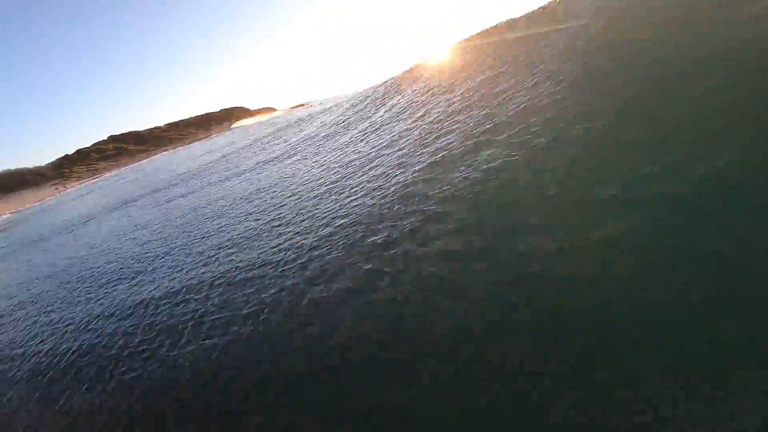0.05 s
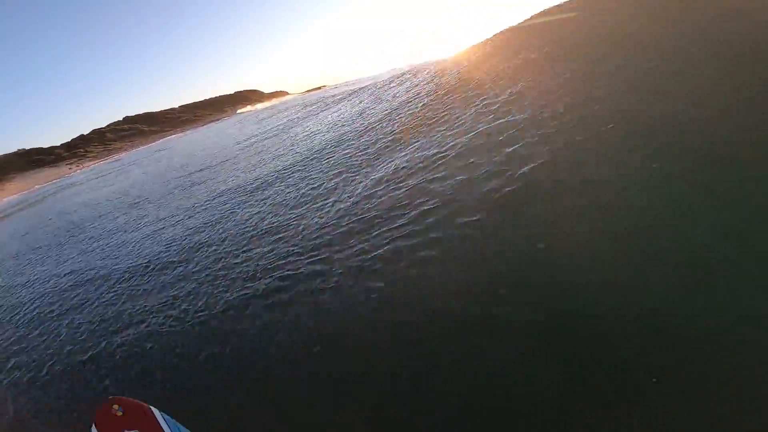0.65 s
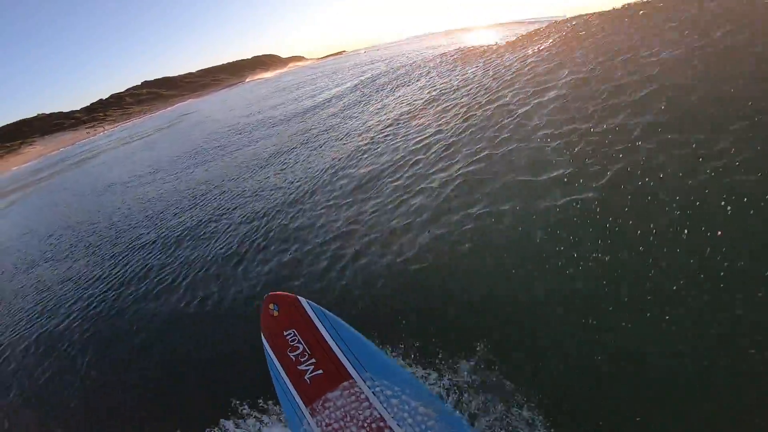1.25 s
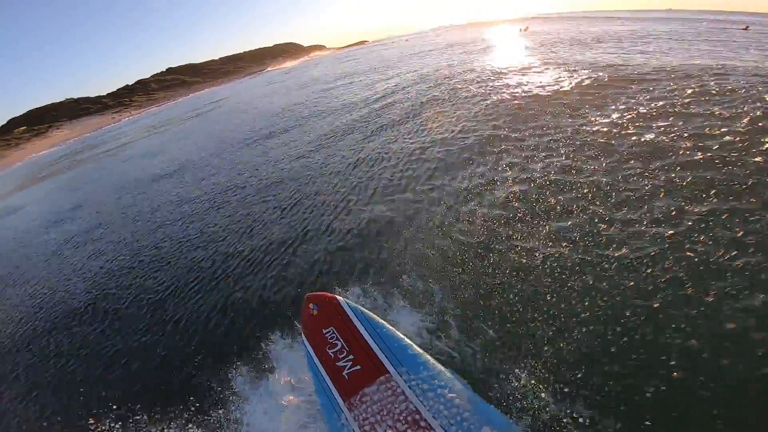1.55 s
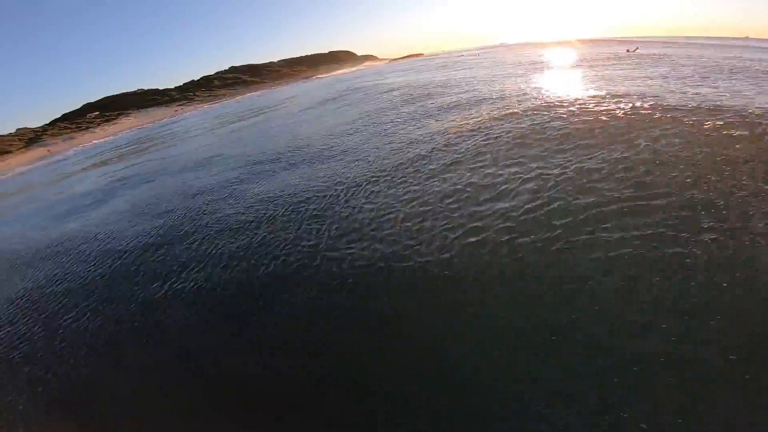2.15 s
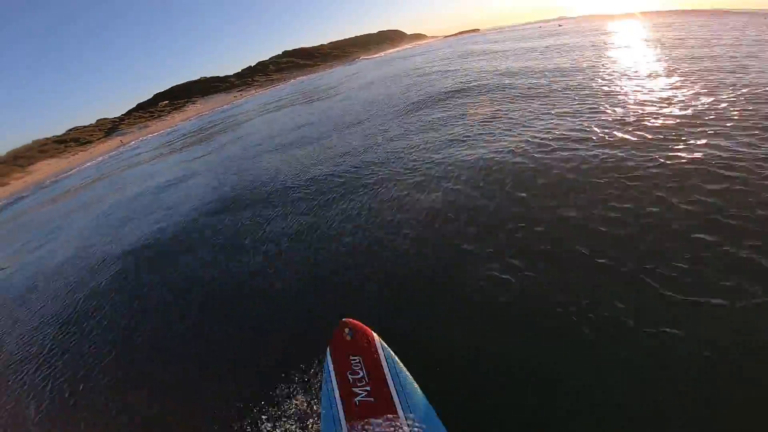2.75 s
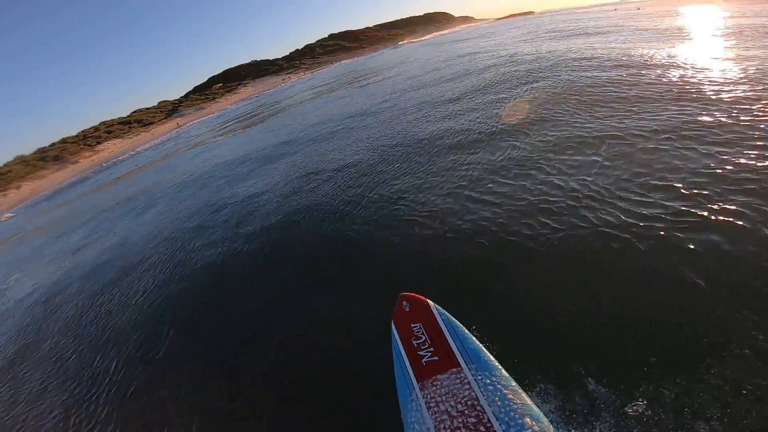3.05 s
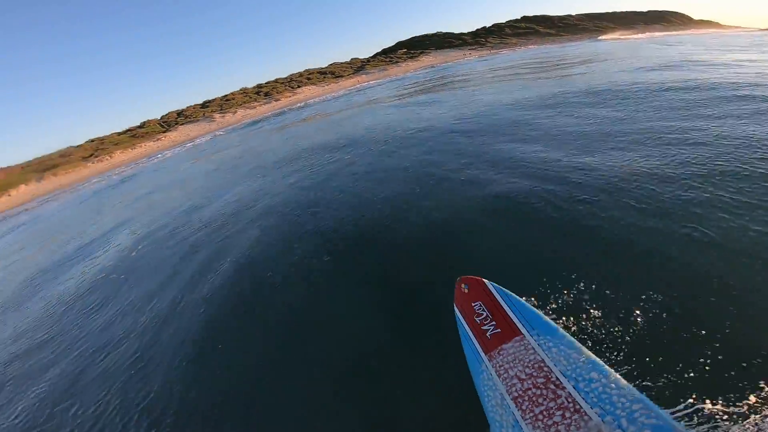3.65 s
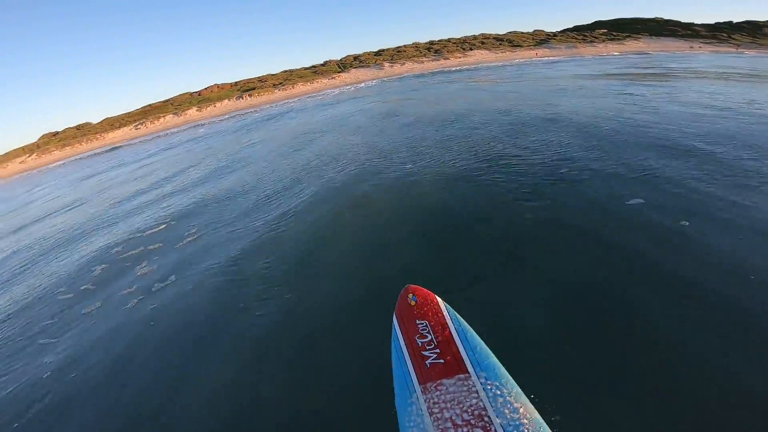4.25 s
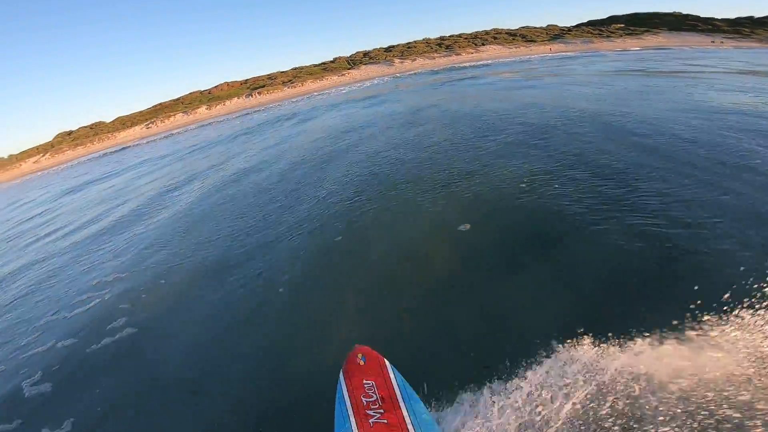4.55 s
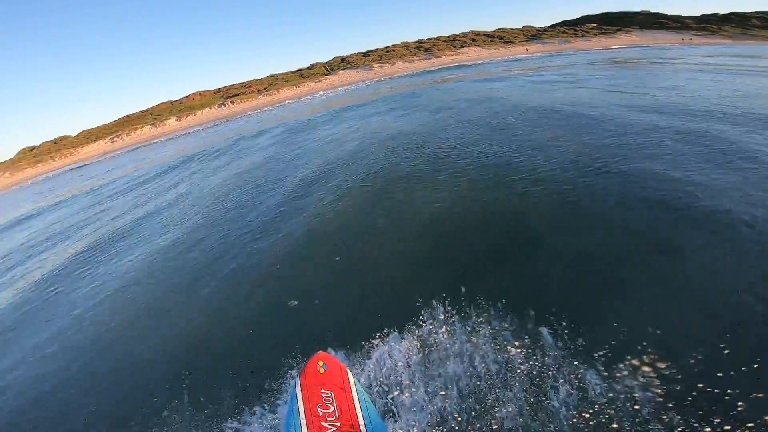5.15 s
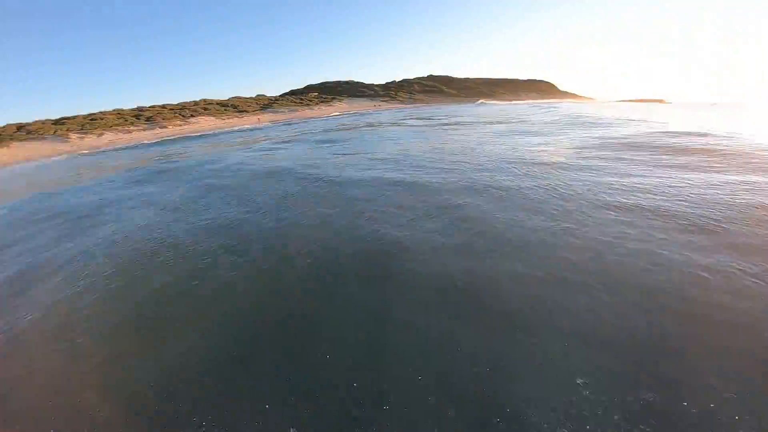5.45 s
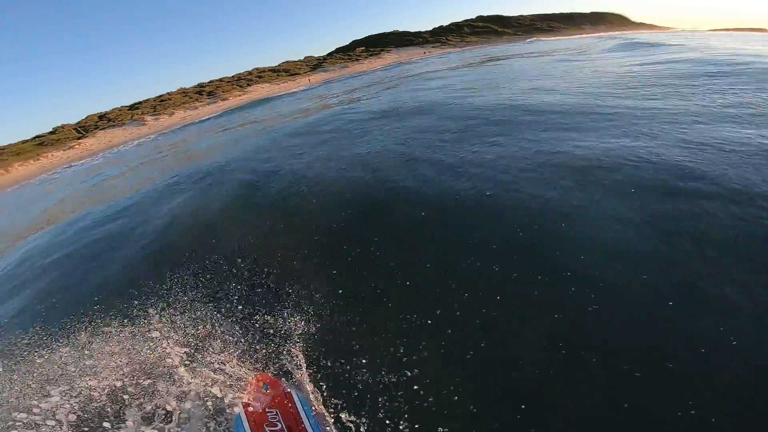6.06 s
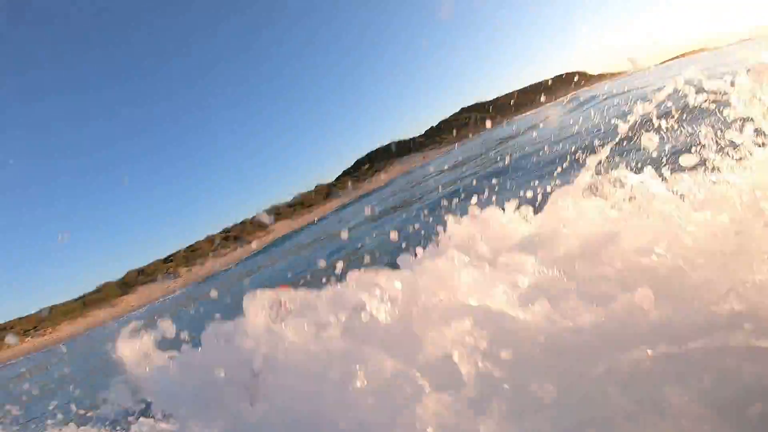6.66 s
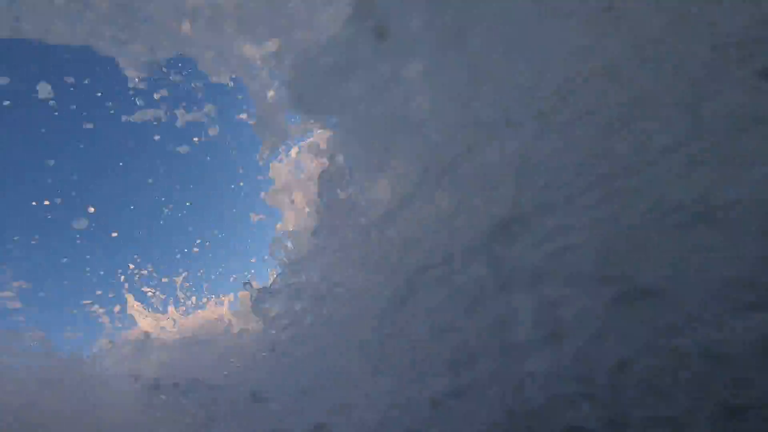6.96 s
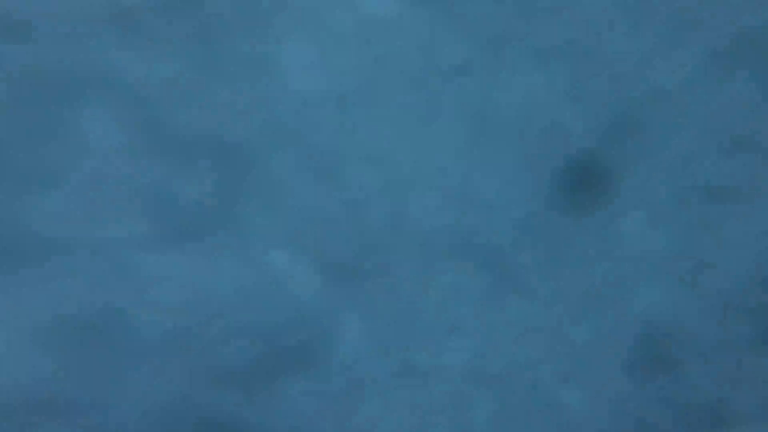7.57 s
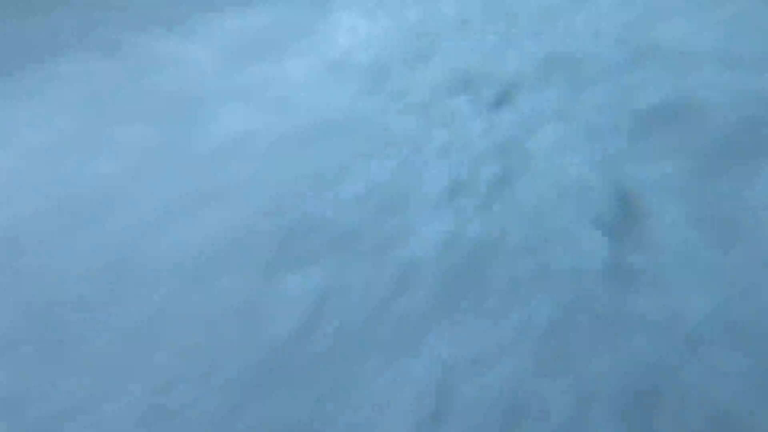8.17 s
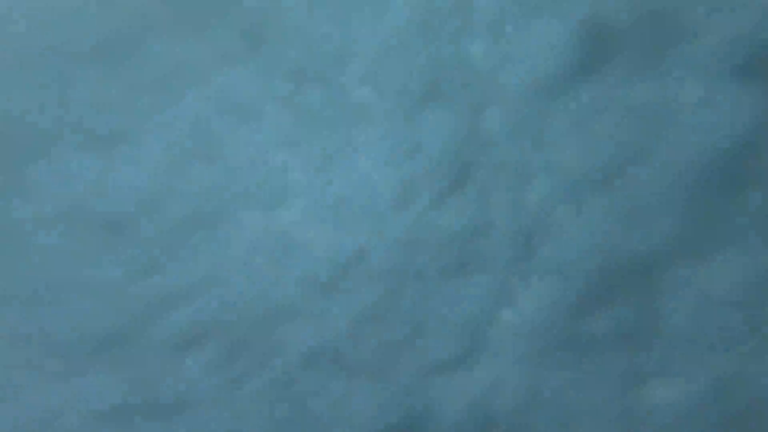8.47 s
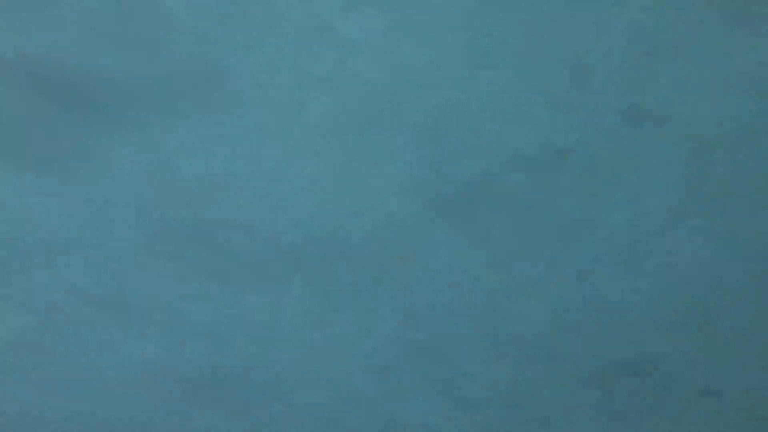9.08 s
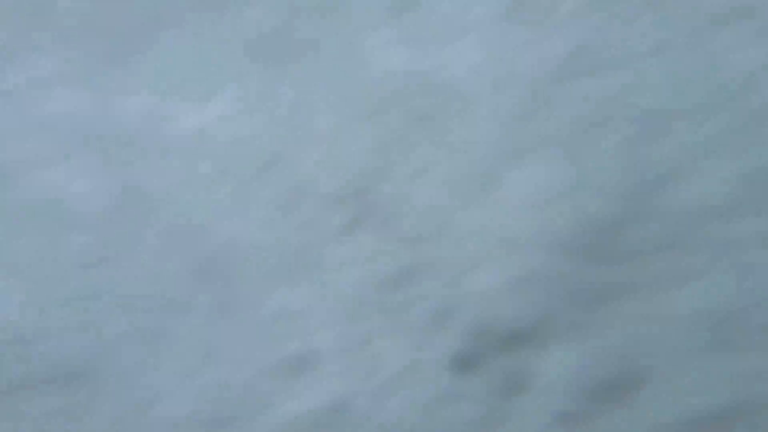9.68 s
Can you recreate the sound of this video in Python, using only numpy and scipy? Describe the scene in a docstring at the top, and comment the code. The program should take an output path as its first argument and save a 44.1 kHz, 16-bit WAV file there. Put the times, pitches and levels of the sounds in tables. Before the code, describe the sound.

Heard close up from a surfboard on a wave, rushing water, fizzing spray and gusts of wind swell and ease, dotted with small splashes. A hollow roar of whitewater builds from behind and breaks over the microphone with spatters and a sharp slap. The hiss then gives way to a dull underwater rumble, with surging clouds of bubbles, single bloops, light crackling and faint thin tones.

```python
"""Whitewater roars, hisses and sprays from a surfboard, heard at a small camera that rides with it.
The water sounds through trapped air: each bubble is a resonator, lower in pitch the larger it is.
Turbulent wind buffets the microphone. At about 7 s the wave breaks over the camera, and all is
muffled: a churning rumble, clouds of bubbles, fine crackle and a few thin, flickering tones."""
import sys
import numpy as np
from scipy import signal
from scipy.fft import rfft, irfft, next_fast_len
from scipy.io import wavfile

SR = 44100
rng = np.random.default_rng(int(sys.argv[2]) if len(sys.argv) > 2 else 0)


def persist_wave(psi):
    """Save psi, clipped to +-1, as 16-bit WAV."""
    counts = np.round(np.clip(psi, -1, 1) * 32767).astype(np.int16)
    wavfile.write(sys.argv[1], SR, np.atleast_2d(counts).T)


N = 433062
T = np.arange(N) / SR
PLUNGE_S = 7.36  # the microphone goes under
FILM = np.clip(1 + (T - PLUNGE_S) / 0.21, 0, 1)  # a film of water closes over it, from 0 to 1
FILM_PITCH = 0.76 ** FILM  # wash and foam sink beneath the film


# How hard the board cuts the water: t/s, relative level/dB
BOARD_CUT = [(0.0, -31.5), (0.71, -35.5), (0.82, -30), (1.45, -30.5), (1.81, -38), (2.08, -35),
             (2.3, -41.5), (3.88, -41), (3.9, -35.5), (4.37, -34.5), (4.61, -39.5), (6.41, -31),
             (6.74, -35.5), (6.92, -28.5), (7.23, -32.5), (7.25, -37), (7.33, -30)]
def cut_gain(glide_db, follow):
    """Power law: the level is glide_db at an easy glide and gains follow dB per dB of harder cut."""
    return amp(glide_db + follow * (curves(BOARD_CUT)[0] + 36))


# Sheets thrown by a turn or the falling lip: peak t/s, rise/s, roar level/dB, foam level/dB, pitch factor
WATER_SHEETS = [(0.15, 0.63, -53, -41, 1.9), (0.48, 0.034, -24.5, -54, 2.3), (0.81, 0.13, -19, -43.5, 1.09),
                (1.08, 0.51, -22, -46, 1.26), (1.86, 0.24, -22, -59, 0.69), (2.65, 0.046, -20.5, -44, 0.43),
                (3.98, 0.21, -23.5, -40, 0.37), (4.215, 0.086, -22.5, -34, 1.42),
                (4.405, 0.045, -20, -41, 1.38), (4.9, 0.36, -37.5, -45.5, 2.2),
                (5.48, 0.31, -24, -58, 1.35), (6.27, 0.75, -27, -40, 1.7), (6.98, .015, -32.5, -25, 1.3),
                (7.07, 0.06, -29, -30, 0.54), (7.19, 0.047, -16, -28.5, 1.1)]
SHEET_FALL = 1.43  # fall time over rise time
# Roar of wake and sheets: f/Hz, relative level/dB
ROAR_SPECTRUM = [(90, -16), (180, 1.5), (280, -2.5), (420, -4.5), (620, -7.5), (1000, -13), (1600, -21),
                 (3000, -52), (15000, -94)]
def whitewater():
    """Incoherent sources add in power: wake and sheets roar together, and the stronger sets the pitch."""
    wake, sheets, approach = np.square(whitewater_gains())
    power = wake + sheets
    pitch = (0.87 * wake + curves(WATER_SHEETS)[-1] * sheets) / power
    chop_db = 2.3 - 2.4 * approach / (power + approach)  # the choppy face gives way to even whitewater
    return sliding(white(), ROAR_SPECTRUM, pitch) * eddies(rate_hz=45, depth_db=chop_db) * np.sqrt(power)


def whitewater_gains():
    """Pressure amplitudes of the wake, the thrown sheets and the breaker catching up from behind."""
    wake = cut_gain(glide_db=-33.5, follow=0.3)
    sheets = swells(WATER_SHEETS, SHEET_FALL, count=1)[0]
    approach = amp(-16.5 - 13 * np.maximum(6.585 - T, 0))  # gains 13 dB/s, then holds
    return wake, sheets, approach


# Hollow roar of the curl: f/Hz, relative level/dB
BREAKER_SPECTRUM = [(70, -1.5), (160, -5), (380, -1), (600, -2), (900, -4.5), (2300, -16), (4000, -41.5),
                    (15000, -89)]
def breaker():
    """Collective oscillation: the curl's cloud of air roars, swelling as it nears, sinking as it folds."""
    fold_s, octaves_per_s = 6.18, 1.05
    pitch = 1.06 * 2 ** (-octaves_per_s * np.clip(T - fold_s, 0, PLUNGE_S - fold_s))
    roar = sliding(white(), BREAKER_SPECTRUM, pitch)
    return roar * eddies(rate_hz=40, depth_db=1.1) * whitewater_gains()[2]


# Wash of the board: f/Hz, relative level/dB
WASH_SPECTRUM = [(200, -6.5), (500, 2), (900, 0.5), (1600, 2), (2300, 0.5), (3100, -1.5), (3600, -7),
                 (5000, -28), (5900, -33), (10000, -59)]
# Fizz of its foam: f/Hz, relative level/dB
FOAM_SPECTRUM = [(1500, -37), (3000, -17), (3700, -0.5), (4500, 4), (5050, 3.5), (5600, -6), (6500, -34.5),
                 (15000, -77.5)]
def board():
    """Drop impact and bubble resonance: the board tears the water into wash, foam and spray."""
    sheet_foam = swells(WATER_SHEETS, SHEET_FALL, count=2)[1]
    foam_gain = np.hypot(cut_gain(glide_db=-42.5, follow=0.7), sheet_foam)
    # loud foam and the breaking lip land on the camera, where single bubbles and spatters stand out
    near = np.maximum(np.clip((20 * np.log10(foam_gain) + 38) / 7, 0, 1), FILM)
    drops = droplets(per_s=2500, spread_db=2.0)  # each drop ticks in wash, fizz and spray alike
    foam = cloud(low_hz=1545, high_hz=4760, per_s=1400, cycles=27, rise=0.16)
    froth = np.sqrt(1 - near / 2) * unit(white() + 0.32 * drops) + np.sqrt(near / 2) * foam
    spatter = eddies(rate_hz=32, depth_db=0.8 + 1.5 * near)
    wash = sliding(white() + 0.76 * drops, WASH_SPECTRUM, FILM_PITCH) * cut_gain(glide_db=-31, follow=1)
    fizz = sliding(froth, FOAM_SPECTRUM, FILM_PITCH) * eddies(rate_hz=40, depth_db=0.7 + 0.5 * near)
    return (fizz * foam_gain + spatter * (wash + spray(drops))) * amp(-4.5 * FILM)


# Hiss of fine drops: f/Hz, relative level/dB
SPRAY_SPECTRUM = [(3000, -17.5), (5700, -0.5), (8300, 0.5), (10000, -5.5), (12000, -13), (14000, -25.5),
                  (15500, -43.5)]
# Spray flying off the nose: t/s, relative level/dB
SPRAY_PLUME = [(0.0, -56), (0.16, -62), (1.16, -58), (1.43, -52), (2.04, -56), (2.47, -63), (4.14, -53.5),
               (4.55, -54.5), (5.43, -48.5), (5.57, -51.5), (6.35, -46.5), (6.7, -55), (7.1, -44.5),
               (7.33, -51.5)]
def spray(drops):
    """Low-pass filtering: the spray's upper edge falls as water films over the microphone."""
    def mist_db(hz, t):
        edge_hz = 7700 * (1 + np.exp(np.minimum((6.92 - t) / 0.12, 2)))
        return read(SPRAY_SPECTRUM, hz) - 10 * np.log10(1 + (hz / edge_hz) ** 20)
    mist = shaped(white() + 0.72 * drops, mist_db) * amp(curves(SPRAY_PLUME)[0] + 4)
    return mist * eddies(rate_hz=85, depth_db=5.8 * FILM)  # it reaches the microphone in shreds


# Strength of the turbulence under water: t/s, relative level/dB
TURBULENCE = [(7.41, -15), (7.52, -16), (8.3, -14), (8.55, -17), (8.8, -16), (9.18, -25.5), (9.27, -19.5),
              (9.52, -24), (9.67, -18), (9.81, -14)]
# Shaking of the housing: f/Hz, relative level/dB
RUMBLE_SPECTRUM = [(10, -16.5), (50, 3), (125, -1), (180, -3.5), (260, -15), (450, -37), (4000, -100)]
def rumble():
    """Forced vibration: turbulent pressure shakes the submerged housing."""
    shaking = colour(white(), RUMBLE_SPECTRUM) * eddies(rate_hz=23, depth_db=-0.6)
    return shaking * amp(curves(TURBULENCE)[0] - 0.5)


# Clouds of air sweeping past: peak t/s, rise/s, churn level/dB, gurgle level/dB, crackle level/dB
AIR_GUSHES = [(7.58, 0.11, -14, -46, -56), (7.7, 0.1, -16.5, -71, -86), (7.97, 0.12, -21, -55.5, -59.5),
              (8.2, 0.13, -18, -41.5, -53.5), (8.35, 0.059, -18, -29, -44),
              (8.71, 0.059, -20.5, -35.5, -57.5), (8.87, 0.047, -24, -29.5, -62),
              (9.16, 0.15, -33, -40.5, -63.5), (9.37, 0.11, -25.5, -48, -62.5),
              (9.76, 0.22, -23, -42.5, -51.5)]
def bubble_gains():
    """Power summation: steady shedding by turbulence plus gushes, for churn, gurgle and crackle."""
    stir_db = curves(TURBULENCE)[0] + 16
    shed = amp([-22 + 2 * stir_db, -54 + 0.2 * stir_db, -70.5 + 0.4 * stir_db])
    return np.hypot(shed, swells(AIR_GUSHES, fall=0.78, count=3))


# Churn of large bubbles: f/Hz, relative level/dB
CHURN_SPECTRUM = [(90, -12), (170, 5), (250, 4.5), (380, 2.5), (500, -4.5), (700, -18.5), (950, -25.5),
                  (1400, -34), (3000, -84.5)]
# Their changing size: t/s, pitch factor
CHURN_PITCH = [(7.36, 1.22), (7.8, 0.7), (8.15, 1.11), (8.32, 1.62), (8.5, 1.3), (9.35, 1.53), (9.7, 1.15)]
def churn():
    """Resonance varies inversely with radius: the large bubbles' spectrum slides with their size."""
    large = cloud(low_hz=127.9, high_hz=1078, per_s=750, cycles=17.6, rise=0.22) + 0.43 * white()
    return sliding(large, CHURN_SPECTRUM, curves(CHURN_PITCH)[0]) * bubble_gains()[0]


# Gurgle of small bubbles: f/Hz, relative level/dB
GURGLE_SPECTRUM = [(300, -19.5), (600, 9), (900, 4.5), (1400, 13), (1750, 1.5), (2100, -19.5), (3000, -32),
                   (9000, -75)]
# Crackle of tiny ones: f/Hz, relative level/dB
CRACKLE_SPECTRUM = [(900, -23.5), (2000, 2), (2700, 1.5), (3500, 0), (4800, -16), (8000, -25.5),
                    (11000, -46)]
def small_bubbles():
    """Damped resonance: small bubbles ring around the housing and tiny ones pop on it."""
    _, gurgle_gain, crackle_gain = bubble_gains()
    pops = cloud(low_hz=915, high_hz=8070, per_s=700, cycles=7.8, rise=0.096, spread_db=4.5)
    small = cloud(low_hz=552, high_hz=2790, per_s=930, cycles=11, rise=0.082)
    bunches = eddies(rate_hz=15, depth_db=3.0)
    gurgle = colour(small + 0.49 * pops + 0.5 * white(), GURGLE_SPECTRUM) * gurgle_gain
    crackle = colour(pops + 1.4 * white(), CRACKLE_SPECTRUM) * crackle_gain
    return bunches * (gurgle + crackle)


# Large pockets of air folded under by the wave: start t/s, duration/s, f/Hz, fall/octaves, level/dB
AIR_POCKETS = [(6.34, 0.25, 665, .15, -23.5), (6.48, 0.24, 485.6, 0.09, -22), (6.63, 0.23, 583, .25, -24),
               (6.82, .19, 204, 1.0, -14), (7.21, 0.14, 161.4, .5, -17.5), (7.51, .11, 290, .2, -17),
               (7.813, .06, 980, .05, -33), (8.15, .08, 440, .1, -21)]
def pockets():
    """Cavity resonance: each pocket of air swells into a hollow note and sinks in pitch."""
    out = np.zeros(N)
    for s, length, hz, fall, db in AIR_POCKETS:
        age = np.linspace(0, 1, int(length * SR))
        note = noisy_tone(hz * 2 ** (fall * (.5 - age)), width_hz=0.28 * hz, pure=0.46)
        add(out, s, amp(db) * note * np.sin(np.pi * age))
    return out


# Single bubbles at the microphone, and a sharp slap of water at 6.994 s that rings as briefly: t/s, f/Hz, peak
# level/dB
CLOSE_BUBBLES = [(6.994, 2980, -9.5), (7.034, 4400, -8.5), (7.358, 550, -12.5), (8.104, 760, -19.5),
                 (8.136, 1310, -26), (8.168, 487, -18), (8.279, 970, -19.5), (8.302, 602, -14),
                 (8.385, 546, -15.5), (8.777, 510, -19), (9.083, 2600, -44), (9.085, 567, -23.5),
                 (9.133, 560, -12), (9.139, 1340, -29), (9.345, 477, -17.5), (9.423, 1620, -27),
                 (9.456, 3680, -43), (9.555, 3150, -34), (9.644, 397, -14)]
def bloops():
    """Free oscillation: each bubble rings for the same number of cycles, so high ones die sooner."""
    out, cycles = np.zeros(N), 17
    for s, hz, db in CLOSE_BUBBLES:
        ring = bubble(hz, cycles / hz, rise=0.086)
        add(out, s, amp(db) * ring / abs(ring).max())
    return out


# Drops and slaps of water at the microphone: t/s, peak level/dB, centre f/Hz, t60/s
WATER_IMPACTS = [(0.728, -10.5, 238, 0.074), (1.815, -15.5, 704, 0.49), (2.08, -16, 350, 0.08),
                 (2.236, -17, 454, 0.078), (2.347, -20, 380, 0.3), (2.634, -13.5, 246, 0.083),
                 (4.165, -16, 980, 0.47), (4.269, -15, 606, 0.076), (4.425, -17, 850, 0.07),
                 (3.41, -26, 550, 0.22), (4.43, -13.5, 210, 0.5), (4.607, -19, 597, .035),
                 (4.812, -20, 1670, 0.034), (5.006, -13.5, 1690, 0.038), (5.468, -17, 1950, 0.023),
                 (6.781, -19, 4460, 0.0061), (6.9, -10.5, 915, .03), (6.946, -21, 5760, 0.022),
                 (7.176, -13, 2500, .014), (7.198, -13, 1180, 0.087), (7.335, -13, 1360, 0.043),
                 (7.351, -3.5, 820, 0.014), (8.221, -30, 1600, 0.048), (8.358, -20, 1590, 0.012),
                 (8.523, -23, 600, 0.048), (8.886, -33, 1520, 0.058), (9.042, -27, 940, 0.024),
                 (9.204, -31.5, 1370, 0.039), (9.342, -23.5, 790, .016), (9.491, -24.5, 1990, 0.016),
                 (9.546, -28.5, 1040, 0.019), (9.737, -21, 600, 0.02)]
def splats():
    """Impact noise: each slap is a band of noise with a fast rise and an exponential decay."""
    out, t = np.zeros(N), T[:SR // 4]
    for s, db, hz, t60 in WATER_IMPACTS:
        envelope = np.minimum(t / (0.04 * t60), 1) * np.exp(-np.log(1000) * t / t60)
        band = signal.butter(3, [hz / 1.7, hz * 1.7], "band", fs=SR, output="sos")
        splat = signal.sosfilt(band, rng.standard_normal(len(t)) * envelope)
        add(out, s, amp(db) * splat / abs(splat).max())
    return out


# Buffeting of the microphone: f/Hz, relative level/dB
WIND_SPECTRUM = [(10, -11), (45, 1), (115, 2.5), (170, -2.5), (250, -8), (400, -21), (2500, -82.5)]
# Steady airflow over it: t/s, level/dB
AIRFLOW = [(1.5, -19), (2.3, -21.5), (3.15, -22.5), (3.75, -26.5), (4.4, -21.5), (5.3, -22), (5.8, -27),
           (6.3, -22.5), (6.9, -18.5), (7.35, -10.5)]
# Gusts as the rider turns: peak t/s, rise/s, level/dB
TURN_GUSTS = [(0.7, 0.038, -20), (1.75, 0.4, -19), (2.22, .03, -21), (3.21, 0.01, -17),
              (3.41, 0.052, -16.5), (3.58, 0.027, -22.5), (3.95, 0.15, -16.5)]
def wind():
    """Turbulent pressure: eddies buffet the microphone, smaller and higher when the fast board roars."""
    roar_db = 10 * np.log10(np.square(whitewater_gains()).sum(0))
    pitch = 2 ** ((roar_db + 26) / 36.5)  # an octave per 36.5 dB of whitewater
    strength = np.hypot(amp(curves(AIRFLOW)[0]), swells(TURN_GUSTS, fall=3.8, count=1)[0])
    return sliding(white(), WIND_SPECTRUM, pitch, size=4096) * eddies(rate_hz=18, depth_db=0.7) * strength


# Thin tones heard under water: start t/s, end t/s, f/Hz, bandwidth/Hz, level/dB
THIN_TONES = [(7.37, 7.6, 635, 80, -28), (7.35, 7.94, 1000, 220, -32), (7.37, 7.67, 2030, 130, -49),
              (7.36, 7.49, 2830, 200, -53), (7.37, 7.69, 4500, 900, -58), (7.81, 8.14, 4500, 900, -62),
              (8.35, 9.16, 1130, 170, -45), (8.3, 8.91, 1930, 500, -48.5), (8.3, 8.91, 2450, 300, -52.5),
              (9.47, 9.67, 3050, 600, -53)]
def thin_tones():
    """Thin, flickering narrow-band tones: each swells, creeps upward and stops."""
    out, octaves_per_s = np.zeros(N), 0.08
    flutter = eddies(rate_hz=60, depth_db=4.5)
    for start, end, hz, width_hz, db in THIN_TONES:
        t = T[:round((end - start) * SR)]
        pure = 40 / width_hz  # wider bands flicker more
        band = noisy_tone(hz * 2 ** (octaves_per_s * (t - t.mean())), width_hz, pure)
        band = unit(band * (pure + flutter[round(start * SR):][:len(t)]))
        add(out, start, amp(db) * band * signal.windows.tukey(len(t), .2))
    return out


# Thin hiss of the board on the smooth face: t/s, upper edge f/Hz, level/dB
SKIM_HISS = [(.6, 6900, -49.5), (1.0, 7350, -46.5), (1.5, 7000, -42.5), (1.8, 6000, -48), (2.4, 5100, -58),
             (3.4, 4970, -42.5), (4.1, 6800, -49), (5.25, 6220, -42.5), (5.7, 6350, -70)]
def skim():
    """Band-limited noise: an octave of hiss whose sharp upper edge slides as the board runs."""
    def band_db(hz, t):
        ratio = (hz + 1) / curves(SKIM_HISS, t)[0]
        return -10 * np.log10((1 + ratio ** 60) * (1 + (0.5 / ratio) ** 10))
    return shaped(white(), band_db) * amp(curves(SKIM_HISS)[1])


def surface_foam():
    """Shot noise: foam fizzes faintly overhead as the camera rises."""
    level_db = np.interp(T, [9.3, 9.55, 9.8], [-110, -80, -75])
    return colour(droplets(per_s=900, spread_db=3.5), SPRAY_SPECTRUM) * amp(level_db)


def bubble(hz, t60, rise):
    """Damped oscillator: a pinched-off bubble swells into its ring, and its pitch climbs as it dies."""
    age = np.arange(int(t60 * SR) + 8) / SR / t60
    swell = 1 - np.exp(-(5 * age) ** 2)
    return np.sin(2 * np.pi * hz * t60 * age * (1 + rise * age / 2)) * np.exp(-np.log(1000) * age) * swell


def cloud(low_hz, high_hz, per_s, cycles, rise, spread_db=0, count=28):
    """Superposition: bubbles of many sizes, born at random, with about equal energy per Hz."""
    out = np.zeros(N)
    for hz in np.geomspace(low_hz, high_hz, count):
        ring = bubble(hz, cycles / hz, rise)
        born, chance, size, sign = rng.random((4, N // 128))
        alive = chance < per_s / count * 128 / SR
        gain = amp(-spread_db * np.log(size + .02)) * np.sign(sign - .5) * hz
        at = (born[alive, None] * N).astype(int) + np.arange(len(ring))
        out += np.bincount(at.ravel(), (gain[alive, None] * ring).ravel(), N)[:N]
    return unit(out)


def droplets(per_s, spread_db):
    """Shot noise: random clicks, most small, a few large."""
    size = amp(spread_db * np.minimum(rng.exponential(1, N), np.pi + 1))
    return unit(size * rng.choice([-1, 1], N) * (rng.random(N) < per_s / SR))


def noisy_tone(hz, width_hz, pure):
    """Narrow-band noise around a tone of strength pure, both following the pitch curve hz."""
    detune = np.fft.fftfreq(SR, 1 / SR) / (width_hz / 2)
    noise = rng.standard_normal(SR) + 1j * rng.standard_normal(SR)
    flutter = np.fft.fft(noise / (1 + detune ** 4))[:len(hz)]
    flutter = flutter / np.sqrt(np.mean(abs(flutter) ** 2))
    return unit(((pure + flutter) * np.exp(2j * np.pi * np.cumsum(hz) / SR)).real)


def eddies(rate_hz, depth_db):
    """Amplitude modulation: a gain that wanders at random, up to rate_hz times a second."""
    t = T[::128]
    rates = rate_hz * 2 ** -rng.uniform(0, np.pi, 30)
    sway = sum(np.sin(2 * np.pi * (hz * t + rng.random())) for hz in rates)
    return unit(amp(depth_db * np.interp(T, t, unit(sway))))


def swells(rows, fall, count):
    """Power sum of rounded swells, a gain for each of count level columns; fall is in rise times."""
    s, rise_s, *levels = np.transpose(rows)
    t = T[::64]
    age = (t - s[:, None]) / rise_s[:, None]
    shape = np.exp(-np.maximum(-age, age / fall) ** 1.7)
    return [np.interp(T, t, np.sqrt(amp(db) ** 2 @ shape ** 2)) for db in levels[:count]]


def shaped(x, db_of, size=1024):
    """Time-varying filter of constant power, shaped by db_of(hz, t); the result has an rms of 1."""
    frames = dict(nperseg=size, noverlap=size - size // 4)
    hz, t, z = signal.stft(x, SR, **frames)
    gain = amp(db_of(hz[:, None], t[None]))
    gain = gain / np.sqrt((gain ** 2).mean(0))
    return unit(signal.istft(z * gain, SR, **frames)[1][:N])


def sliding(x, spectrum, factor, size=1024):
    """Frequency scaling: filters x by a spectrum that slides by a pitch factor given per sample."""
    return shaped(x, lambda hz, t: read(spectrum, hz / np.interp(t, T, factor)), size)


def colour(x, spectrum):
    """Linear filter of constant spectrum; the result has an rms of 1."""
    size = next_fast_len(N)
    gain = amp(read(spectrum, np.fft.rfftfreq(size, 1 / SR)))
    return unit(irfft(rfft(x, size) * gain, size)[:N])


def read(spectrum, hz):
    """A spectrum's level, interpolated over log frequency."""
    f, db = np.transpose(spectrum)
    return np.interp(np.log(hz + 1), np.log(f + 1), db)


def curves(rows, t=T):
    """Linear interpolation of each column of a table in time."""
    s, *columns = np.transpose(rows)
    return [np.interp(t, s, column) for column in columns]


def add(mix, s, sound):
    """Superposes a sound at time s."""
    part = mix[round(s * SR):][:len(sound)]
    part += sound[:len(part)]


def white():
    """White noise."""
    return rng.standard_normal(N)


def amp(db):
    """Decibels to amplitude ratio."""
    return 10 ** (np.asarray(db) / 20)


def unit(x):
    """Normalises to an rms of 1."""
    return x / np.sqrt(np.mean(x ** 2) + 1e-30)


def scene():
    """Impedance mismatch: airborne sound gives way to that of the water as the wave closes over."""
    under = np.clip((T - PLUNGE_S) / 0.05 + .5, 0, 1)
    air = wind() + whitewater() + breaker() + board() + skim()
    water = rumble() + churn() + small_bubbles() + surface_foam()
    return ((1 - under) * air + np.sqrt(under) * water + pockets() + thin_tones() + bloops() + splats())[None]


def record(dry):
    """Soft saturation rounds the loudest peaks; a low-pass filter limits the band."""
    rounded = dry / (1 + dry ** 8) ** (1 / 8)
    low_pass = signal.firwin(511, cutoff=15100, window=("kaiser", 9), fs=SR)
    return signal.oaconvolve(rounded, low_pass[None], "same")


dry = scene()
out = record(dry)
persist_wave(out)
```